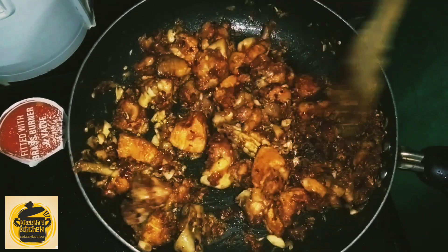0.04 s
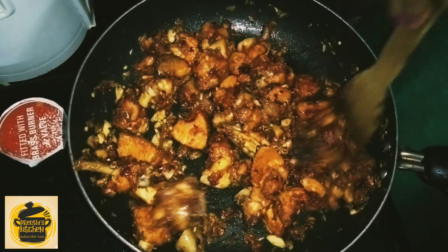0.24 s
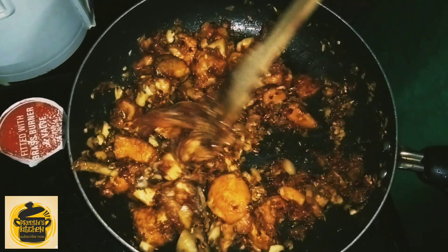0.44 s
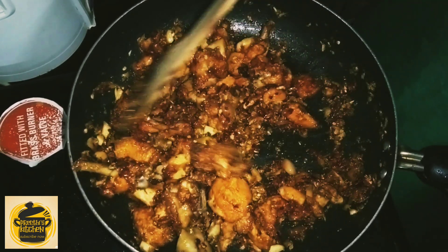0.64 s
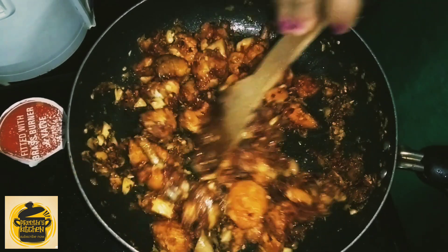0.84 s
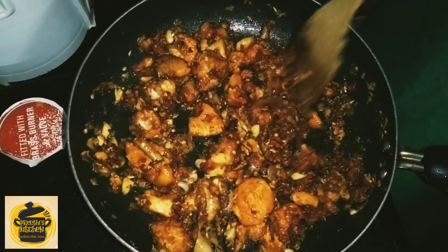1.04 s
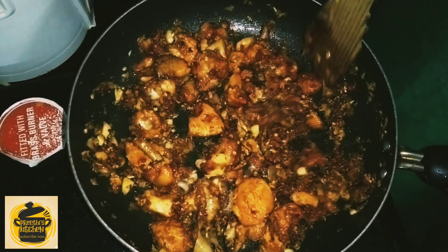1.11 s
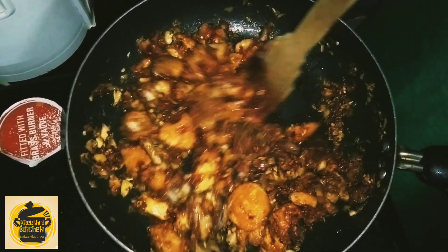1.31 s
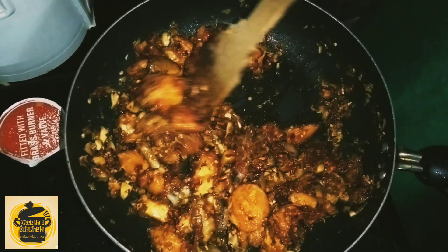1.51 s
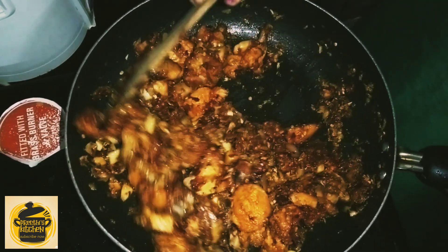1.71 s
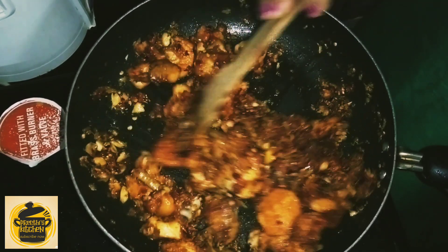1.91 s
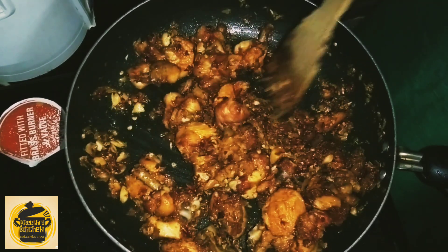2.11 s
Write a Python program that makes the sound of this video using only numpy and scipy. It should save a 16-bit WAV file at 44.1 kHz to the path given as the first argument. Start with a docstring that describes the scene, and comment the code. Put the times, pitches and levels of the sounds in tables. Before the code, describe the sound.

Wooden spatula knocks and scrapes through wet, spiced chicken sizzling in a hot non-stick pan

```python
"""A gritty rub over sizzling comes first, then wooden spatula knocks and drags across a hot pan
full of wet, spiced chicken. Knocks and stick-slip clicks ring damped pan modes; grit is band noise
grains; squeaks are rough sliding tones. The stand thrums as a low resonance; sizzle, steam whistles
and fat spits are grains and noise in bands, over a faint kitchen room tone."""
import sys
import numpy as np
from scipy import signal
from scipy.fft import rfft, irfft
from scipy.io import wavfile

SR = 44100
rng = np.random.default_rng(int(sys.argv[2]) if len(sys.argv) > 2 else 0)


def store_wav(level_fs):
    """Save 16-bit WAV to argv[1]."""
    pcm = np.round(np.clip(np.atleast_2d(level_fs), -1, 1) * 32767)
    wavfile.write(sys.argv[1], SR, pcm.T.astype(np.int16))


N = 94815


def amp(db):
    """dB to gain."""
    return 10 ** (np.asarray(db) / 20)


def rms_one(x):
    """Scale to rms 1."""
    return x / np.sqrt(np.mean(x ** 2) + 1e-20)


def in_time(rows):
    """Columns of a time table as curves over every sample."""
    time_s, *columns = np.transpose(rows)
    return [np.interp(np.arange(N) / SR, time_s, column) for column in columns]


def at_hz(points, hz):
    """Value of a spectrum table at a frequency, interpolated on log frequency."""
    table_hz, table_db = np.array(points).T
    return np.interp(np.log(hz), np.log(table_hz), table_db)


def drift(rate_hz):
    """Slow random curve of rms 1: noise through two equal poles, run at SR / 40."""
    step = 40
    settle = 1000
    r = np.exp(-2 * np.pi * rate_hz * step / SR)
    noise = rng.standard_normal(N // step + settle + 2)
    slow = signal.lfilter([1], [1, -2 * r, r * r], noise)[settle:]
    return np.interp(np.arange(N) / step, np.arange(len(slow)), rms_one(slow - slow.mean()))


def ring(drive, hz, t60_s):
    """Two-pole resonator: a unit click starts a decaying sine of height 1."""
    r = amp(-60 / (t60_s * SR))
    w = 2 * np.pi * hz / SR
    return signal.lfilter([0, np.sin(w)], [1, -2 * r * np.cos(w), r * r], drive + 1e-18)


def grains(per_s, spread_db):
    """Random clicks of uneven size and either sign, at rms 1."""
    size_db = spread_db * np.minimum(rng.exponential(1, N), 5)
    sizes = amp(size_db) * rng.choice([-1, 1], N)
    return rms_one(sizes * (rng.random(N) < per_s / SR))


def burst(start_s, peak_db, pitch_hz, half_width_octaves, fade_s):
    """Puff of band noise with a sudden start and an exponential decay."""
    t = np.arange(N) / SR - start_s
    edges_hz = np.clip(pitch_hz * 2 ** np.array([-half_width_octaves, half_width_octaves]), 50, 8600)
    puff = rng.standard_normal(N) * (t >= 0) * np.exp(-np.maximum(t, 0) / fade_s)
    band = signal.butter(3, edges_hz, "band", fs=SR, output="sos")
    puff = signal.sosfilt(band, puff + 1e-18)
    return amp(peak_db) * puff / np.abs(puff).max()


# room noise spectrum: pitch_hz, relative_level_db
ROOM_TONE_SPECTRUM = [(25, -28), (80, -22.5), (100, -4), (142, -12), (211, -8), (320, 1), (683, -9.5),
                      (1100, -10), (1800, -18.5), (5000, -28), (9000, -20), (11000, -31.5), (15500, -27)]
ROOM_TONE_DB = -75.5


def room_tone():
    """Faint steady kitchen noise, shaped in the frequency domain."""
    hz = np.maximum(np.arange(N // 2 + 1) * SR / N, 1)
    spectrum = rfft(rng.standard_normal(N)) * amp(at_hz(ROOM_TONE_SPECTRUM, hz))
    return amp(ROOM_TONE_DB) * rms_one(irfft(spectrum, N))


# stand hum level: time_s, level_db
THRUM_LEVEL = [(0.0, -73.5), (0.19, -93), (0.24, -60.5), (0.37, -67), (0.47, -83.5), (0.76, -79.5),
               (0.8, -61.5), (0.99, -97.5), (1.06, -60.5), (1.18, -80), (1.27, -61.5), (1.37, -78),
               (1.41, -60), (1.6, -96), (1.69, -63.5), (1.77, -61), (1.9, -86.5), (2.15, -82)]
THRUM_HZ, THRUM_T60_S = 151.1, 0.19


def thrum():
    """The stand under the pan hums low: noise through a long and a short resonance."""
    hum = ring(rng.standard_normal(N), THRUM_HZ, THRUM_T60_S)
    hum = ring(hum, THRUM_HZ, 0.023)
    return amp(in_time(THRUM_LEVEL)[0]) * rms_one(hum)


# sizzle level: time_s, middle_db, top_db (above 5 kHz), bottom_db (below the split, before its trim)
SIZZLE_LEVEL = [(0.0, -57, -53, -63), (0.148, -60, -64.5, -61), (0.151, -44.5, -55, -57),
                (0.18, -52.5, -56.5, -56.5), (0.27, -49, -60.5, -58), (0.39, -57.5, -63, -62),
                (0.65, -63, -56, -73.5), (0.66, -65.5, -59.5, -57), (0.93, -47, -57, -56.5),
                (1.07, -60, -59, -66), (1.14, -57, -68, -69.5), (1.19, -66, -56.5, -62),
                (1.21, -69, -63, -46), (1.32, -61, -65.5, -51), (1.43, -58, -69, -71),
                (1.45, -60.5, -58.5, -76.5), (1.54, -65, -59.5, -66), (1.63, -61, -63.5, -82),
                (1.69, -58, -55, -56), (1.87, -55.5, -55, -56.5), (1.877, -45, -55, -56),
                (1.89, -48, -48.5, -52), (2.04, -55, -63, -58), (2.09, -70, -55.5, -66),
                (2.096, -62, -57, -52.5), (2.15, -64, -64, -53)]
# sizzle spectrum: pitch_hz, relative_level_db
SIZZLE_SPECTRUM = [(2400, 2), (2900, -10.5), (3500, -7), (4200, -4), (4550, -8.5), (5000, -1), (5500, -9),
                   (6500, -4), (7200, -7.5), (8000, -11)]
SIZZLE_SPLIT_HZ, BOTTOM_TRIM_DB, COLOUR_TRIM_DB = 3300, -0.5, -9.5
FIZZ_PER_S, FIZZ_SPREAD_DB, FIZZ_T60_CYCLES = 24000, 3, 130
PATCH_DB, PATCH_RATE_HZ, FLICKER_DB, FLICKER_RATE_HZ = 8.0, 3.7, 4, 43.0
FULL_FIZZ_DB = -50  # patches even out as a band nears this level


def sizzle():
    """Steam bubble grains ring narrow bands; each flares as food patches fry, less when it is loud."""
    middle_db, top_db, bottom_db = in_time(SIZZLE_LEVEL)
    fizz = grains(FIZZ_PER_S, FIZZ_SPREAD_DB)
    dealt = rng.integers(0, 4, N)  # each grain feeds every fourth band
    bands_hz = np.linspace(2450, 8000, 26) * rng.uniform(.99, 1.01, 26)
    out = 0
    for k, hz in enumerate(bands_hz):
        top_share = np.clip(np.log2(hz / 4800) / 0.067, 0, 1)
        lower_db = middle_db if hz > SIZZLE_SPLIT_HZ else bottom_db + BOTTOM_TRIM_DB
        band_db = top_share * top_db + (1 - top_share) * lower_db
        patchy = np.clip((FULL_FIZZ_DB - band_db) / 8, .15, 1)
        patch_db = PATCH_DB * patchy * np.tanh(0.6 * drift(PATCH_RATE_HZ))
        flicker_db = FLICKER_DB * drift(FLICKER_RATE_HZ)
        gain_db = at_hz(SIZZLE_SPECTRUM, hz) + COLOUR_TRIM_DB + patch_db + flicker_db
        bubbles = ring(fizz * (dealt == k % 4), hz, FIZZ_T60_CYCLES / hz)
        bubbles = ring(bubbles, hz, 0.0056)
        out = out + amp(gain_db + band_db) * rms_one(bubbles)
    return out


# thin steam whistles: start_s, length_s, pitch_hz, pole_width_hz, level_db (before the waver)
STEAM_WHISTLES = [(0.116, 0.19, 6980, 119, -65), (.34, 0.11, 3130, 80, -61.5),
                  (.4, 0.19, 2443, 69.9, -68.5), (.4, .3, 4727, 100.4, -66.5),
                  (0.547, 0.31, 6440, 121, -65.5), (0.684, 0.24, 5110, 99.6, -63.5),
                  (.9, 0.38, 4184, 100, -64), (0.928, .26, 2600, 69.7, -69), (.99, .13, 3110, 70, -67),
                  (0.998, 0.13, 7560, 120, -63.5), (1.26, .12, 6510, 120, -64.5),
                  (1.422, 0.5, 4183, 109, -63.5), (1.477, 0.43, 4715, 100, -65.5),
                  (2.026, 0.18, 4163, 100, -62)]
WHISTLE_WAVER_DB, WHISTLE_WAVER_HZ, WHISTLE_FADE_S = 5, 5.3, 0.017


def whistles():
    """Narrow bands of steam hiss set in, waver and stop: noise through two equal resonances."""
    out = 0
    t = np.arange(N) / SR
    for start_s, length_s, hz, pole_width_hz, level_db in STEAM_WHISTLES:
        gate = np.clip(np.minimum(t - start_s, start_s + length_s - t) / WHISTLE_FADE_S, 0, 1)
        t60_s = np.log(1000) / (np.pi * pole_width_hz)
        hiss = ring(ring(rng.standard_normal(N), hz, t60_s), hz, t60_s)
        waver_db = WHISTLE_WAVER_DB * drift(WHISTLE_WAVER_HZ)
        out = out + gate * amp(level_db + waver_db) * rms_one(hiss)
    return out


# fat spits: start_s, peak_db, pitch_hz, half_width_octaves, fade_s (to 1/e)
FAT_SPITS = [(0.2054, -44.5, 6800, 0.18, 0.006), (0.5614, -47.5, 7500, 0.29, 0.0081),
             (0.6232, -38, 6940, 0.18, 0.0049), (0.722, -37, 6690, 0.21, 0.013),
             (0.8857, -43.5, 4270, 0.19, 0.004), (0.918, -44, 3840, 0.22, 0.0016),
             (0.9396, -39, 3520, 0.54, 0.0033), (1.1856, -48, 4260, 0.25, .008),
             (1.874, -28, 4200, 0.63, 0.003), (2.066, -46, 6440, 0.11, 0.0042),
             (2.094, -46.5, 4200, 0.062, 0.0023)]


def spits():
    """Fat spits as short dying puffs of band noise."""
    return sum(burst(*spit) for spit in FAT_SPITS)


# wet blade squeaks: start_s, length_s, first_hz, last_hz, level_db, roughness_hz
BLADE_SQUEAKS = [(0.657, 0.095, 2390, 2334, -61, 35), (0.661, 0.041, 2060, 1966, -63, 40),
                 (0.718, 0.0716, 1460, 1320, -55, 35), (0.79, 0.091, 1270, 1226, -56.5, 35),
                 (0.798, 0.04, 930, 847, -59, 50), (0.914, 0.068, 1010, 976, -65, 35),
                 (1.522, 0.063, 1000, 528, -48.5, 70), (1.669, 0.23, 1150, 1502, -48, 130),
                 (1.666, 0.26, 2340, 2220, -58.5, 90), (1.75, 0.16, 2990, 3040, -60, 60)]


def squeaks():
    """The sliding blade squeaks: a rough narrow tone glides in pitch, swells and fades."""
    out = 0
    for start_s, length_s, first_hz, last_hz, level_db, roughness_hz in BLADE_SQUEAKS:
        part = np.clip((np.arange(N) / SR - start_s) / length_s, 0, 1)
        phase = 2 * np.pi * np.cumsum(first_hz + (last_hz - first_hz) * part) / SR
        rough = drift(roughness_hz) * np.cos(phase) + drift(roughness_hz) * np.sin(phase)
        out = out + amp(level_db) * np.sin(np.pi * part ** 0.86) * rough
    return out


# gritty rub on the pan floor: time_s, level_db
GRIT_LEVEL = [(0, -44.5), (.09, -56.5), (.148, -72), (.151, -42), (.175, -56), (.21, -55), (.214, -46.5),
              (.3, -50), (.36, -51), (.42, -72.5), (.5, -86), (.8, -73), (.87, -49.5), (.95, -73),
              (1.05, -77), (1.204, -75), (1.207, -51), (1.27, -52.5), (1.29, -46), (1.31, -44.5),
              (1.345, -55), (1.4, -56), (1.45, -82), (1.86, -80.5), (1.878, -52.5), (1.98, -53.5),
              (2.05, -63.5), (2.09, -63), (2.1, -61), (2.15, -66)]
GRIT_LOW_HZ, GRIT_TOP_HZ, GRIT_PER_S, GRIT_SPREAD_DB = 1960, 4324, 7900, -1


def grit():
    """Dense fine grains under the blade fill a broad band."""
    band = signal.butter(4, [GRIT_LOW_HZ, GRIT_TOP_HZ], "band", fs=SR, output="sos")
    rub = signal.sosfilt(band, grains(GRIT_PER_S, GRIT_SPREAD_DB))
    return amp(in_time(GRIT_LEVEL)[0]) * rms_one(rub)


# loaded pan modes, also struck by the knocks: pitch_hz, relative_level_db, free_t60_s
PAN_MODES = [(281.4, -8, 0.069), (387.8, -9, 0.25), (504.4, -11, 0.23), (631, -7.5, 0.11),
             (759, -14.5, 0.027), (904, -2.5, 0.091), (962, -6.5, 0.099), (1023, -5, 0.052),
             (1150, -19, 0.013), (1258.4, -1.5, 0.09), (1366, -10.5, 0.033), (1437, -7.5, 0.033),
             (1574.5, -9, 0.054), (1754, -15.5, 0.096), (2015, -19, 0.016), (2095, -11, 0.043),
             (2282, -14.5, 0.014), (2650, -11, 0.036), (3070, -9.5, 0.14)]
# blade drag, one list per stretch: time_s, then level_db of the modes near 350, 850, 1400, 2000 Hz
# (before the family lift)
DRAG_STRETCHES = [
    [(0.01, -95, -66, -42, -49.5), (0.074, -94.5, -64, -56, -58), (0.122, -98, -78, -66.5, -64),
     (0.128, -82.5, -91, -74, -76), (0.136, -78, -83, -69, -72), (0.149, -70, -72, -63, -54)],
    [(0.152, -59, -50, -52, -49), (0.162, -58, -45, -49, -53), (0.178, -57, -50, -43.5, -48),
     (0.2, -53, -45.5, -51, -52), (0.211, -66, -43.5, -41, -48)],
    [(0.235, -36, -41.5, -36.5, -45), (0.271, -40, -35, -42, -48), (0.289, -38, -58, -41, -53),
     (0.305, -54, -39, -52, -62), (0.315, -41, -44, -58, -44)],
    [(0.335, -57, -45, -34.5, -41.5), (0.343, -43, -47, -43.5, -64), (0.353, -51.5, -41, -42.5, -42),
     (0.371, -55.5, -45, -49, -49.5), (0.465, -78, -67.5, -67, -69.5), (0.541, -71, -90, -93, -87.5),
     (0.56, -85, -95, -85.5, -72.5)],
    [(0.6, -68.5, -89, -81, -91), (0.634, -72.5, -81, -86, -75), (0.684, -78, -102, -83, -66),
     (0.708, -69, -69, -74, -74), (0.74, -78, -101, -64, -61), (0.79, -58.5, -100, -65, -88)],
    [(0.8, -76, -74, -72, -72), (0.816, -61, -74, -66, -56), (0.974, -84.5, -76, -82.5, -82.5),
     (1.114, -66.5, -95, -78.5, -99), (1.186, -80, -87, -84, -75.5), (1.2045, -60, -90, -68, -82)],
    [(1.207, -70, -30.5, -37, -52.5), (1.215, -50, -37.5, -30.5, -40), (1.231, -39, -39.5, -44, -44),
     (1.243, -33, -36.5, -36.5, -45), (1.255, -44.5, -43, -38, -55), (1.269, -40, -37, -45, -56),
     (1.272, -38.5, -45, -42, -38.5)],
    [(1.29, -32, -40, -34, -38), (1.302, -32, -32.5, -39.5, -42), (1.42, -49, -54.5, -55, -60),
     (1.456, -65, -52.5, -70, -65), (1.464, -64, -61.5, -56, -69.5), (1.51, -62.5, -56, -70, -63)],
    [(1.54, -75, -44.5, -43, -43), (1.558, -62, -63, -50.5, -51), (1.576, -76, -52.5, -51, -56),
     (1.592, -77, -54.5, -58, -50.5), (1.624, -61.5, -62, -54, -65), (1.65, -67, -66.5, -65, -64)],
    [(1.69, -65, -42.5, -45, -54.5), (1.702, -60, -45, -60, -52), (1.734, -64.5, -52, -54, -62),
     (1.75, -73, -55.5, -53.5, -69), (1.766, -62, -55, -57, -66), (1.785, -79, -66, -44, -62),
     (1.8, -90, -53, -41.5, -51)],
    [(1.82, -83, -78, -53, -55.5), (1.86, -79, -64, -50, -50), (1.868, -81, -70, -47, -63)],
    [(1.885, -87, -79, -47.5, -45.5), (1.951, -76, -82, -57, -59.5), (1.993, -76, -99, -63.5, -65),
     (2.045, -74, -80, -84, -79), (2.055, -71, -96, -86, -82), (2.08, -79, -99, -70, -81)],
    [(2.105, -71, -81, -93, -68), (2.121, -81, -81.5, -99, -74), (2.133, -79, -97, -91, -75.5),
     (2.15, -72, -93, -81.5, -68)],
]
# corners that sort modes into the four families: pitch_hz
FAMILY_CORNERS_HZ = [500, 630, 1010, 1250, 1560, 1800]
# lift of each mode family: lift_db
FAMILY_LIFT_DB = [-0.5, -3, -4, 4.5]
SLIPS_PER_S, SLIP_SPREAD_DB, SLIP_CLUMP_DB, SLIP_CLUMP_HZ = 6000, 2.0, 1.0, 25.0
DRAG_HISS_DB, RASP_DB = -2, -5.5  # against the slips; against the mode tone
MODE_WANDER_DB, MODE_WANDER_HZ = 1.5, 11.0
DRAG_DAMPING = 0.47  # share of the free ring time under the blade


def dragging():
    """Clumped stick-slip clicks and rubbing hiss drive the modes; four families swell apart."""
    levels_db = np.array(in_time(np.concatenate(DRAG_STRETCHES))) + np.array(FAMILY_LIFT_DB)[:, None]
    slip_rate = SLIPS_PER_S * amp(SLIP_CLUMP_DB * drift(SLIP_CLUMP_HZ))
    slips = grains(slip_rate, SLIP_SPREAD_DB)
    rubbing = slips + amp(DRAG_HISS_DB) * rng.standard_normal(N)
    out = 0
    for k, (hz, mode_db, t60_s) in enumerate(PAN_MODES[:-2]):  # top two modes stay silent here
        family = round(np.interp(hz, FAMILY_CORNERS_HZ, [0, 1, 1, 2, 2, 3]))
        tone = ring(rubbing, hz, t60_s * DRAG_DAMPING)
        tone = rms_one(ring(tone, hz, 14.3 / hz))
        # broad rasp between the modes
        rasp = ring(rng.standard_normal(N), hz, 9.7 / hz)
        rasp = rms_one(ring(rasp, hz, 9.7 / hz))
        gain_db = levels_db[family] + mode_db + MODE_WANDER_DB * drift(MODE_WANDER_HZ)
        sign = (-1) ** k
        out = out + sign * amp(gain_db) * (tone + amp(RASP_DB) * rasp)
    return out


# spatula knocks and softer jerks: start_s, peak_db, pitch_hz (struck hardest), spread_octaves,
# damping (share of free ring time), crack_peak_db, rise_s
SPATULA_KNOCKS = [(0.150, -29, 1620, .07, 0.76, -35, 0.00078),
                  (0.1503, -35, 2650, 0.088, 0.7, -61.5, .0007), (0.151, -31, 732, .25, 0.8, -60, 0.0016),
                  (0.2123, -15, 976, 0.63, 0.7, -33, 0.00074),
                  (0.323, -23, 1560, 0.43, 0.14, -33.5, 0.00073),
                  (1.2051, -22, 1150, 0.45, 0.83, -33.5, 0.00062),
                  (1.2102, -26.5, 1290, .15, 0.5, -64, .003),
                  (1.2791, -21.5, 1520, 0.33, 0.14, -28, 0.00061),
                  (1.5212, -27.5, 1235, 0.15, 0.64, -56, 0.0013),
                  (1.522, -33, 2040, 0.089, 0.99, -66, 0.001), (1.66, -33, 1150, 0.23, 0.96, -68, 0.0039),
                  (1.677, -32, 1150, 0.098, 0.77, -63, 0.0039), (1.747, -35, 1400, 0.2, 0.4, -64, 0.0034),
                  (1.791, -32.5, 1260, 0.11, 0.81, -65, .006), (1.801, -28, 1300, 0.1, 0.61, -62, .005),
                  (1.811, -31.5, 1320, 0.24, 0.55, -62, 0.0032),
                  (1.836, -35, 1320, 0.21, 0.65, -63, 0.0038),
                  (1.851, -36.5, 1440, 0.12, 0.69, -60, 0.0034),
                  (2.093, -38.5, 2380, 0.17, 0.52, -39, 0.0014)]
CRACK_FADE_S, CRACK_HZ, CRACK_HALF_WIDTH_OCTAVES = 0.0016, 2590, 0.29
KNOCK_CHANCE_DB = 2  # random spread of each mode per knock


def knocks():
    """Each knock strikes the pan modes near its own pitch hardest, with a dry noise crack."""
    out = np.zeros(N)
    t = np.arange(SR // 4) / SR
    hz, mode_db, t60_s = np.transpose(PAN_MODES)[:, :, None]
    for start_s, peak_db, pitch_hz, spread_octaves, damping, crack_db, rise_s in SPATULA_KNOCKS:
        chance_db = KNOCK_CHANCE_DB * rng.standard_normal(hz.shape)
        nearness = np.exp(-.5 * (np.log2(hz / pitch_hz) / spread_octaves) ** 2)
        strike = nearness * amp(mode_db + chance_db)
        decay = amp(-60 * t / (t60_s * damping))
        blow = np.sum(strike * decay * np.sin(2 * np.pi * hz * t), axis=0)
        blow = blow * np.minimum(t / rise_s, 1) ** 2
        highpass = signal.butter(3, 0.76 * pitch_hz, "high", fs=SR, output="sos")
        blow = signal.sosfilt(highpass, blow)
        blow = amp(peak_db) * blow / np.abs(blow).max()
        start = int(start_s * SR)
        out[start:start + len(t)] += blow[:N - start]
        out += burst(start_s, crack_db, CRACK_HZ, CRACK_HALF_WIDTH_OCTAVES, CRACK_FADE_S)
    return out


MIC_LOW_HZ, MIC_TOP_HZ = 234, 8040


def scene():
    """Pan and food through a thin microphone band, plus stand thrum and room tone at full band."""
    food = sizzle() + whistles() + spits()
    spatula = squeaks() + grit() + dragging() + knocks()
    lowpass = signal.butter(9, MIC_TOP_HZ, fs=SR, output="sos")
    highpass = signal.butter(3, MIC_LOW_HZ, "high", fs=SR, output="sos")
    close = signal.sosfilt(highpass, signal.sosfilt(lowpass, food + spatula))
    return (room_tone() + thrum() + close)[None]


CUTOFF_HZ = 15700  # stopband edge


def record(dry):
    """Steep low-pass: the stopband is 50 dB down."""
    return signal.sosfilt(signal.cheby2(12, 50, CUTOFF_HZ, fs=SR, output="sos"), dry)


dry = scene()
out = record(dry)
store_wav(out)
```